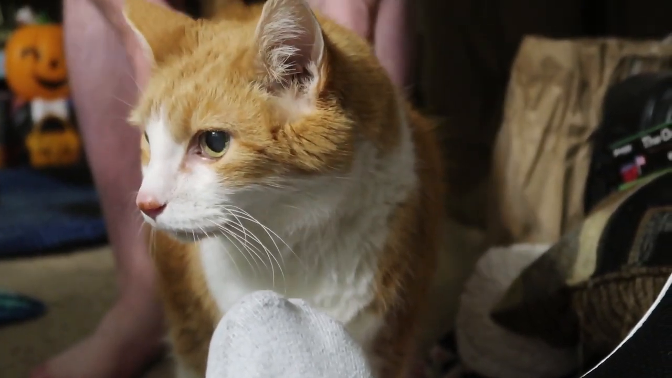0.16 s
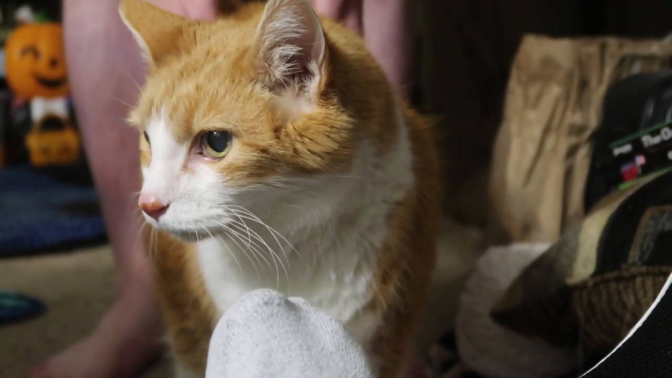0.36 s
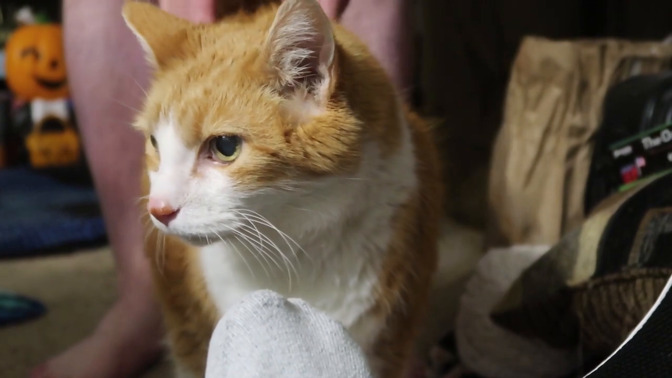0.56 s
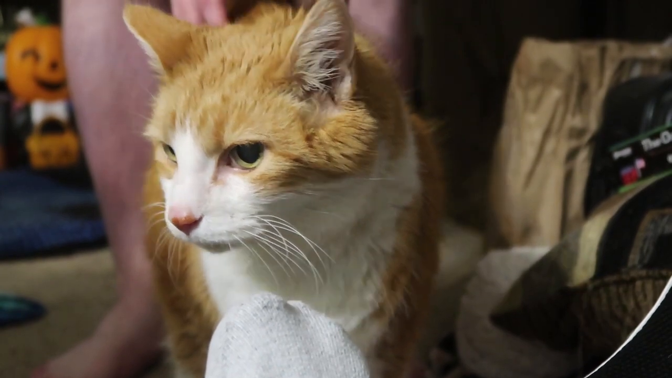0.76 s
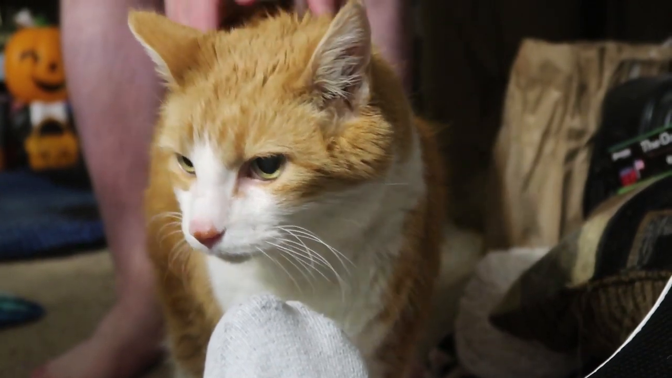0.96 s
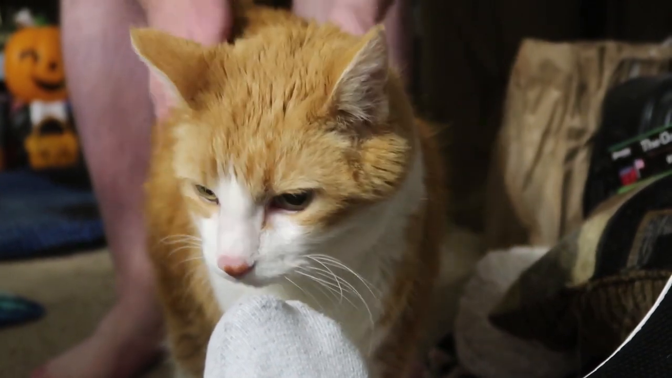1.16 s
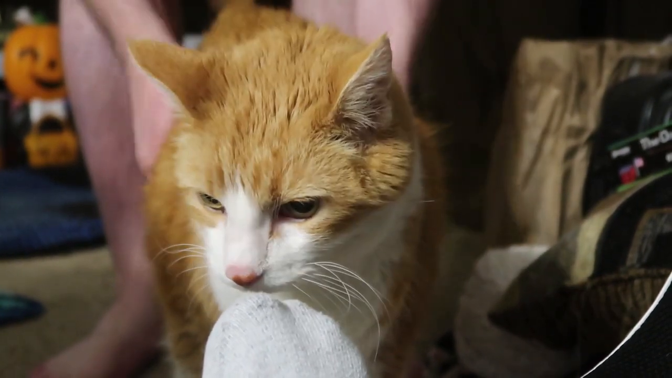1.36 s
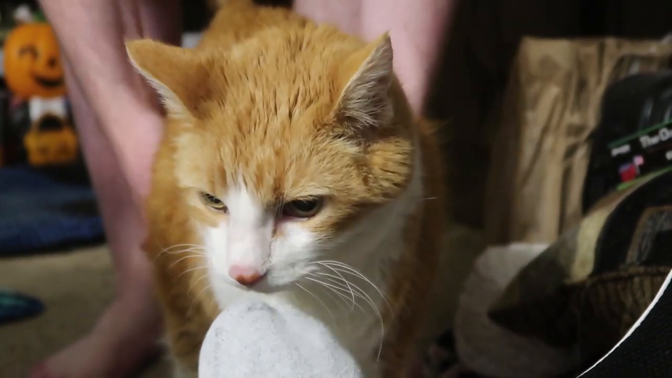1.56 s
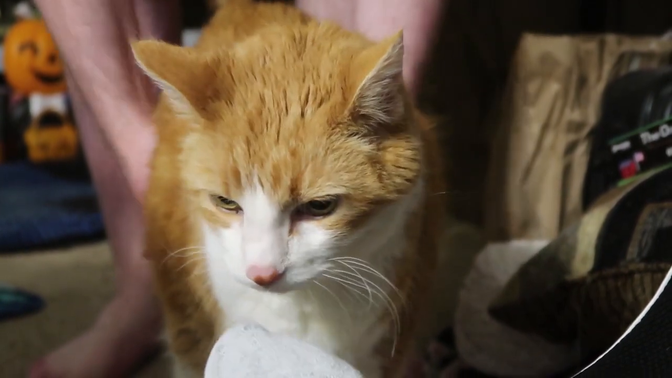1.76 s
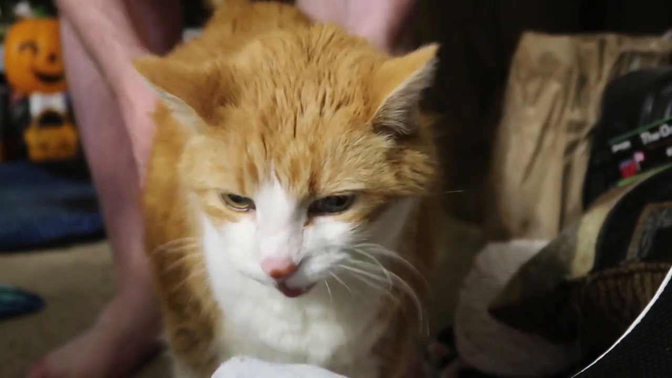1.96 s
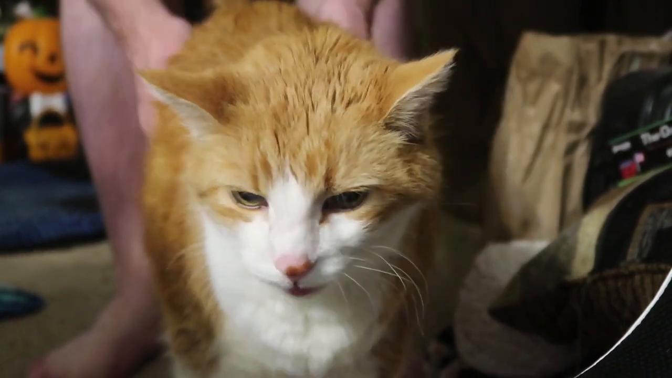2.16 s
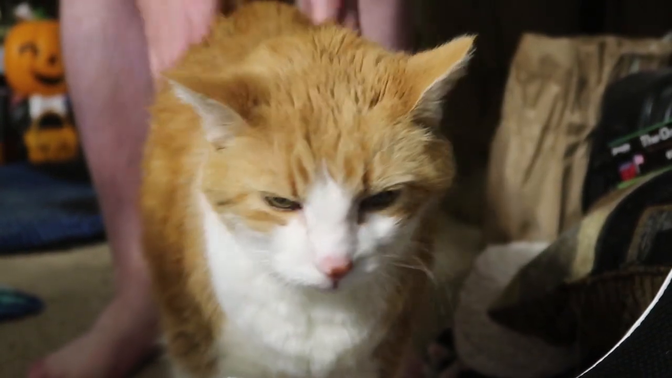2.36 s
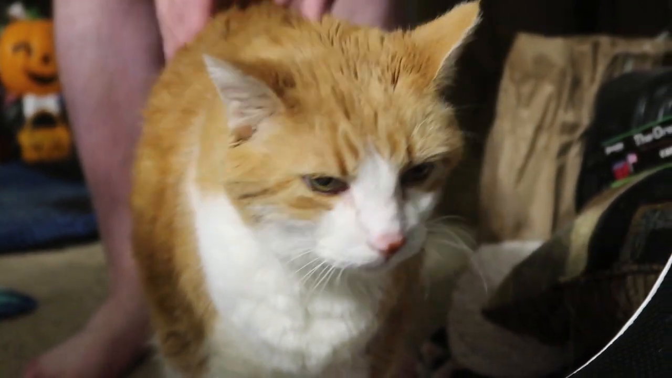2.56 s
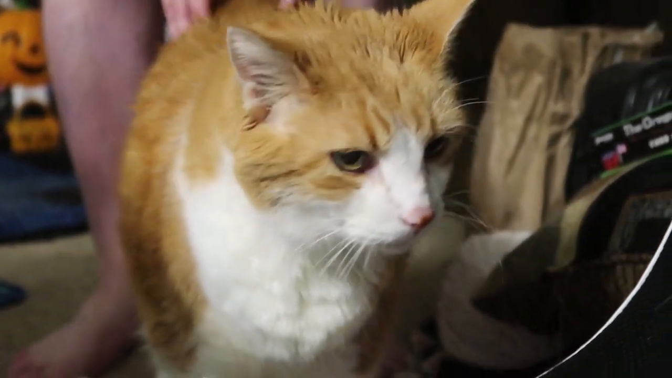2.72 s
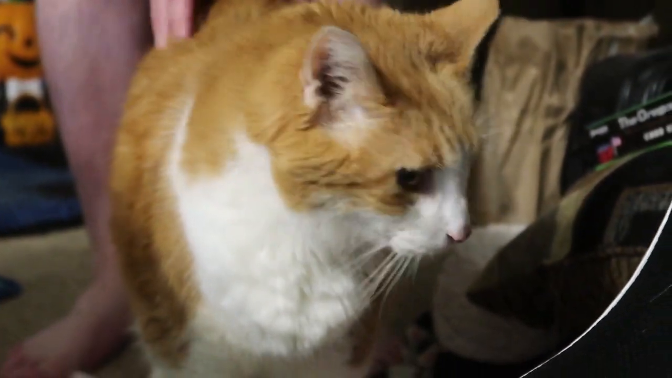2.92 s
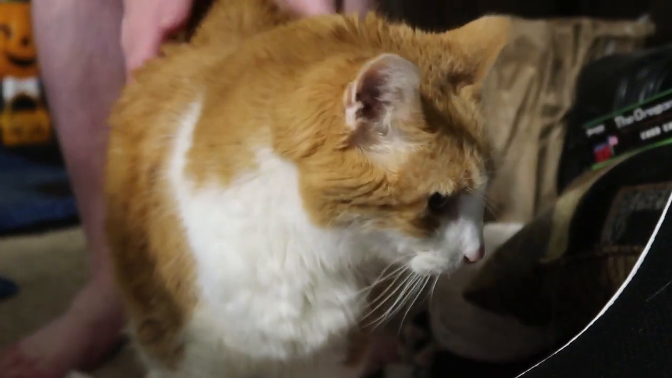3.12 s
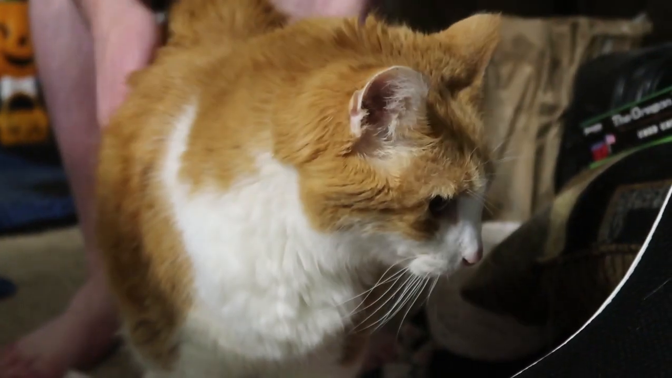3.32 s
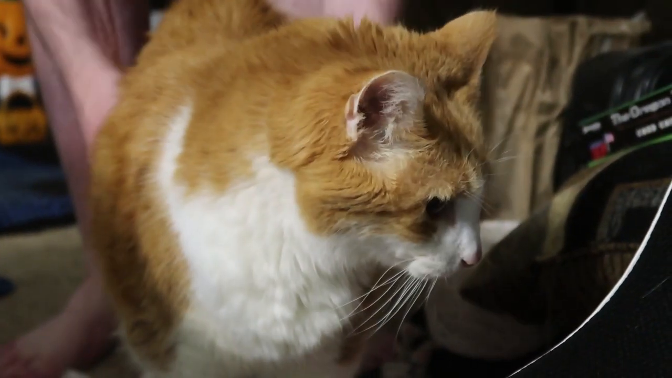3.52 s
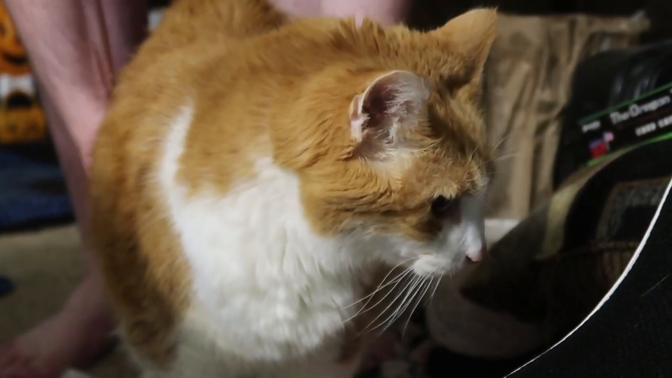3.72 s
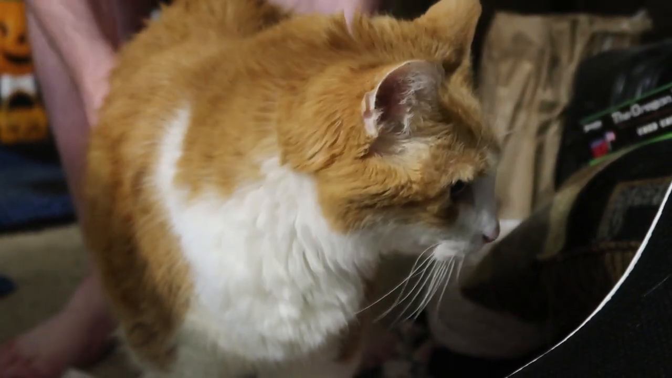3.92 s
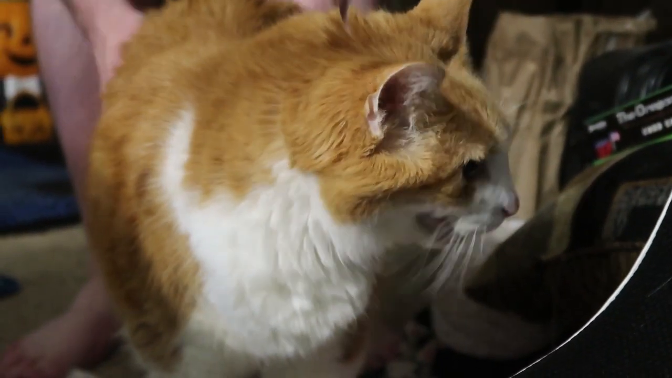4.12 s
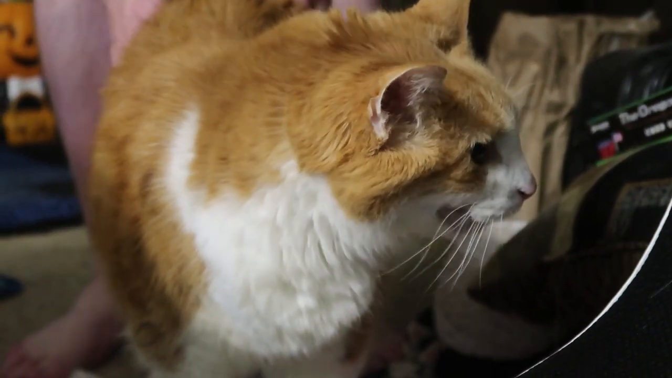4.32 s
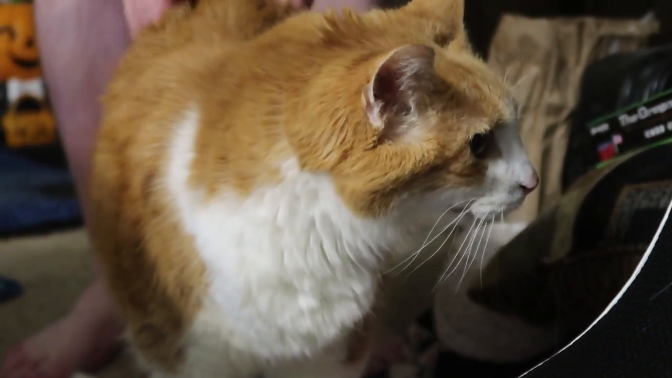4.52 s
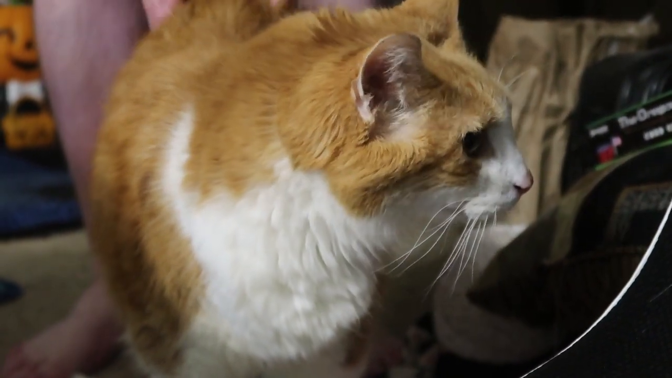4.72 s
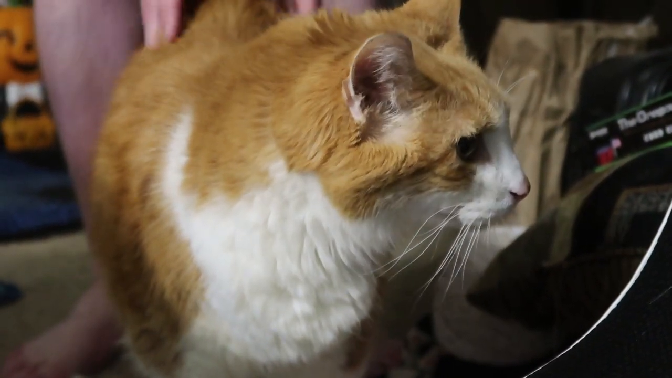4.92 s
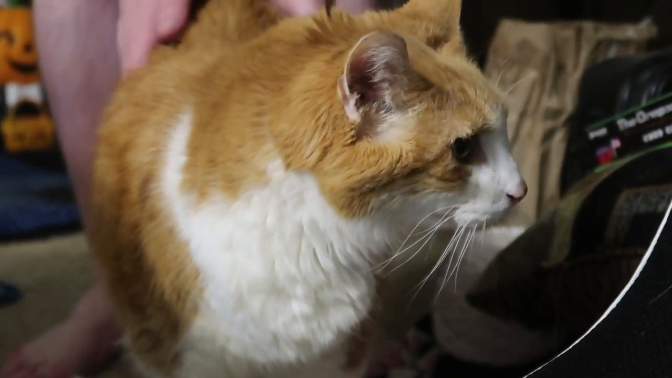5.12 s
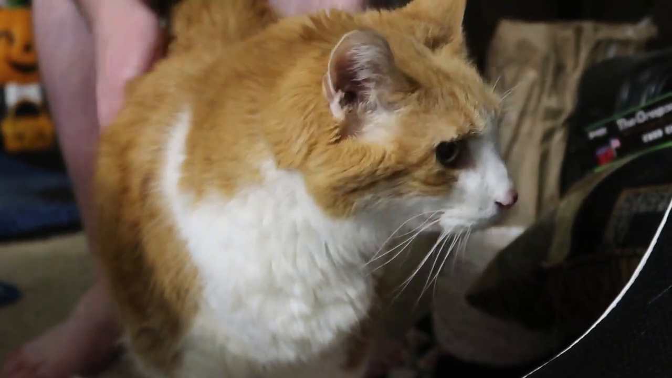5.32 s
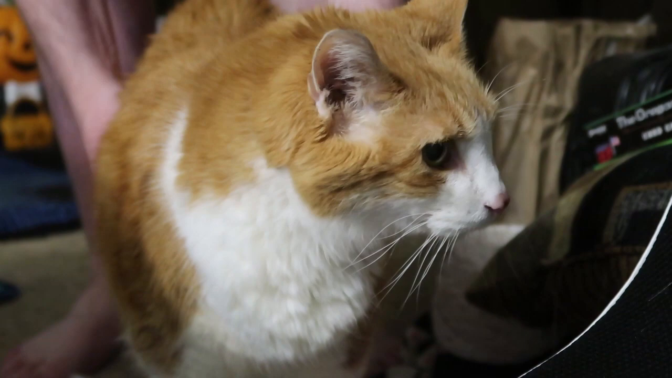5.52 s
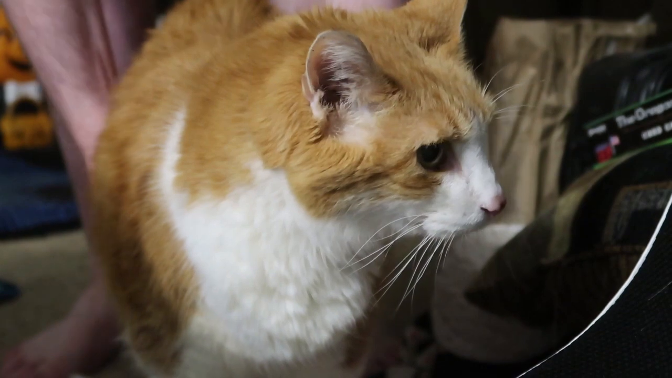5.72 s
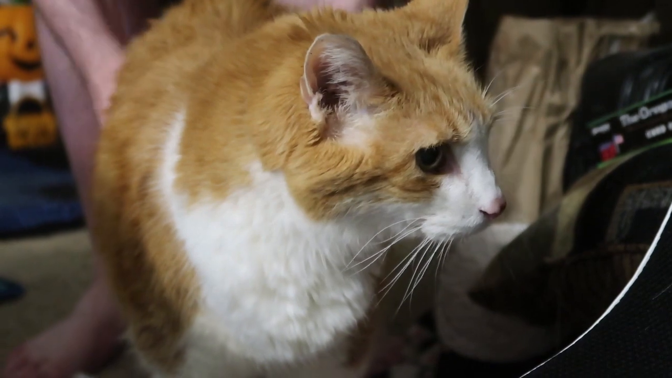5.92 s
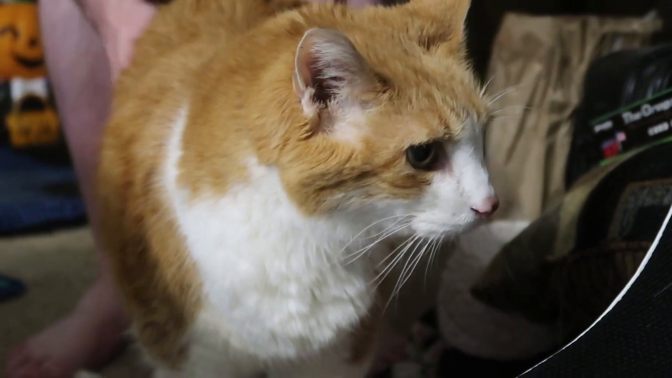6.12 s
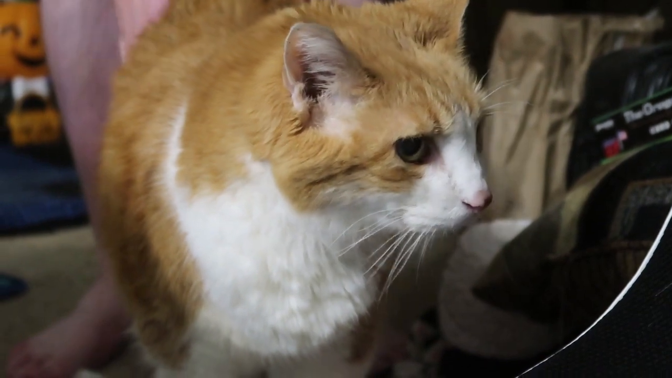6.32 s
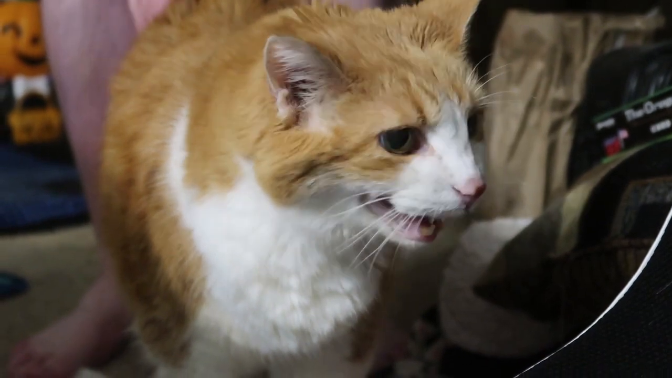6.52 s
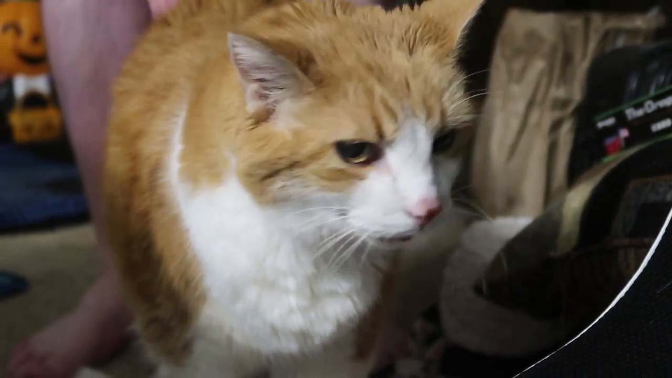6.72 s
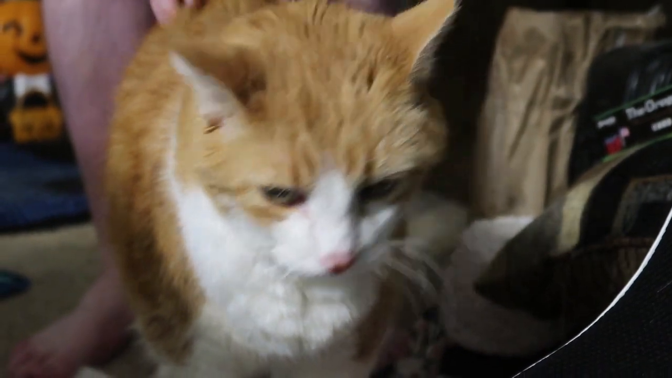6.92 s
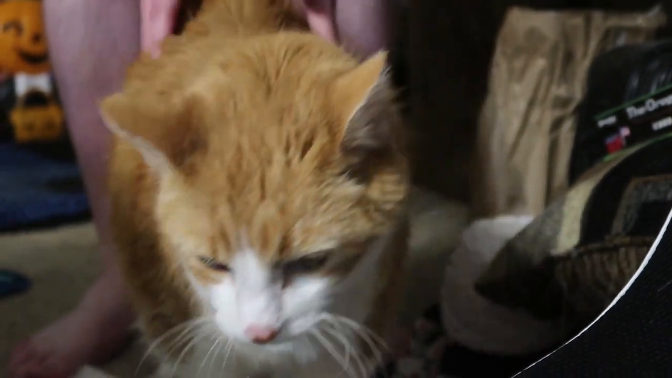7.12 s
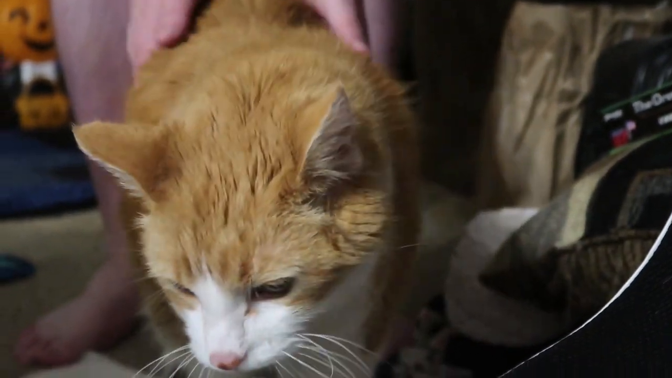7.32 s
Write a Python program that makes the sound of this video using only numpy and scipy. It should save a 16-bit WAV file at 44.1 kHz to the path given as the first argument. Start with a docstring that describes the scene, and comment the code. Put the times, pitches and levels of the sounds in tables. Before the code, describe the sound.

In a quiet carpeted room, a hand faintly strokes a cat's fur with one tiny dry tick. Then the cat meows three times, a couple of seconds apart. Each cry begins as a soft throaty trill, opens into a clear, bright voice, slides downward and closes in a short hum. Low mains hum, room air and light hiss continue underneath. The stereo microphone is close, with very little room echo.

```python
"""A cat meows three times

Close by in a carpeted room, each cry starts as a closed-mouth trill, opens into a clear pulsed voice whose
mouth resonance slides down, and ends in a short hum. Each fold beat is a pulse shaped by resonances.
A hand strokes the fur (shaped noise), and there is one dry tick.
Mains appliances hum (steady tones) over soft room air and microphone hiss (shaped noise).
"""
import sys
import numpy as np
from scipy import signal
from scipy.fft import rfft, irfft, next_fast_len
from scipy.io import wavfile
from scipy.ndimage import map_coordinates

SR = 44100
rng = np.random.default_rng(int(sys.argv[2]) if len(sys.argv) > 2 else 0)


def generate_wav(sig):
    """Save sig (samples, or channels by samples) to the path in sys.argv[1] as 16-bit PCM at SR."""
    pcm = np.round(np.clip(np.atleast_2d(sig).T, -1, 1) * 32767).astype(np.int16)
    wavfile.write(sys.argv[1], SR, pcm)


N = 329427  # length of the scene in samples
TOP_HZ = 13345  # nothing is kept above this
SIZE, LEAD = 2048, 128  # samples in one voice pulse, and how many come before the fold closure
HZ = np.fft.rfftfreq(SIZE, 1 / SR)

# Colour of the background noise shared by both sides: (frequency [Hz], relative level per Hz [dB])
NOISE_SHARED_COLOUR = [(12, -63.5), (20, -8), (27, -11.5), (48, -9.5), (87, -2.5), (123, -4), (145, -6.5),
                       (212, -10), (356, -11.5), (386, -13), (467, -13.5), (535, -16.5), (6000, -32),
                       (11500, -43), (13200, -59)]
# Colour of the background noise that differs between the sides, with a faint extreme-treble edge:
# (frequency [Hz], relative level per Hz [dB])
NOISE_DIFFERENCE_COLOUR = [(12, -35), (20, -27), (43, -25), (117, 1), (294, 3), (455, 3.5), (507, -6.5),
                           (565, -1.5), (665, -4), (972, -4.5), (6000, -20), (9270, -26.5), (11200, -29.5),
                           (12200, -37), (13200, -11.5)]
# Mains lines and motors just under them: (frequency [Hz])
HUM_LINES_HZ = [58.95, 59.44, 59.94, 118.83, 120.06, 178.3, 180.1, 353.87, 360.19]
# Average loudness of each hum line: (level [dB])
HUM_LEVELS_DB = [-71, -72, -63, -64.5, -67.5, -75, -74, -71, -75]
IN_STEP_S = 3.75  # all hum lines are in step at this moment

# Colour of the fur noise: (frequency [Hz], relative level per Hz [dB])
FUR_COLOUR = [(1500, -22), (2300, -2), (2850, -1.5), (3400, -2.5), (4500, -23), (7000, -42)]
STROKE_S, STROKE_LENGTH_S, STROKE_DB = 0.19, 0.95, -68  # the hand's start, duration and level
TICK_S, TICK_SPREAD_S, TICK_DB = .31, .006, -59  # the dry tick's centre, spread and level

# Throbs of the trills: (time [s], chest level [dB], throat level [dB], pitch [Hz])
TRILL_THROBS = [(1.927, -46.5, -47, 210.5), (1.943, -54.5, -44, 222), (4.063, -56, -56, 183),
                (4.073, -45, -68, 209), (4.094, -43, -50, 193), (4.123, -41, -47.5, 196),
                (4.152, -42, -41.5, 220), (6.17, -55, -70, 146), (6.215, -49.5, -56, 180.6),
                (6.232, -46.5, -58, 147.5), (6.285, -51, -55, 219), (6.306, -43.5, -50.5, 172.4),
                (6.336, -43.5, -44, 183.6), (6.362, -44.5, -43.5, 188.3), (6.386, -44, -41.5, 185.5),
                (6.405, -43.5, -50, 162), (6.425, -45.5, -40, 175), (6.445, -46.5, -41.5, 183.6)]
# Low resonances of the closed mouth: (frequency [Hz], width [Hz], relative level [dB])
CLOSED_MOUTH_LOW = [(814, 224, -5.5), (1227, 180, -7)]
# High resonances of the closed mouth: (frequency [Hz], width [Hz], relative level [dB])
CLOSED_MOUTH_HIGH = [(2320, 260, -11.5), (4090, 326, -9.5), (5700, 370, -13)]
# Closed-mouth treble against the throat, for a throb at SOFT_DB: (time [s], level [dB])
TRILL_TREBLE = [(1.93, -13), (4.1, -10), (6.3, -5.5)]
BRIGHTER, SOFT_DB = 0.46, -47.5  # treble gains this many dB per dB of throat level above SOFT_DB

# Voiced stretches: the first cry whole, the later two as a lead-in and a main cry;
# one list per stretch: (time [s], pitch [Hz])
VOICE_PITCH = [
    [(1.965, 232), (1.981, 260.4), (2.015, 224.1), (2.055, 245), (2.199, 242.5), (2.237, 236.8),
     (2.261, 238.5), (2.38, 222), (2.491, 210), (2.527, 197), (2.547, 167), (2.561, 192), (2.575, 186)],
    [(4.176, 253.4), (4.194, 278.4), (4.212, 260), (4.238, 266.6), (4.268, 264)],
    [(4.27, 256.8), (4.298, 232.3), (4.322, 236), (4.388, 222.1), (4.45, 221.3), (4.574, 208.4),
     (4.692, 190.5), (4.708, 178), (4.728, 193), (4.745, 178)],
    [(6.46, 218.6), (6.484, 246), (6.524, 285)],
    [(6.529, 293), (6.539, 293.5), (6.553, 242), (6.581, 227), (6.605, 236.9), (6.665, 234.3),
     (6.685, 230.8), (6.776, 228.8), (6.795, 225.6), (6.865, 225), (6.891, 210.7), (6.913, 185.4),
     (6.93, 188)],
]
# The vocal tract through each stretch:
# (time [s], throat level [dB], chest level [dB], mouth resonance [Hz], jaw opening [0-1])
TRACT_SHAPES = [
    [(1.965, -54, -54, 1610, 0), (1.989, -40.5, -57, 1620, 0.26), (2.007, -33, -45, 1610, 0.48),
     (2.025, -34.5, -49.5, 2040, 0.94), (2.04, -36.5, -55, 2090, 1), (2.074, -36, -63, 2140, 1),
     (2.172, -33, -64, 2140, .97), (2.236, -32.5, -56.5, 2045, 0.95), (2.29, -31, -57, 1793, 0.71),
     (2.338, -30.5, -49, 1616, 0.71), (2.412, -30.5, -50.5, 1664, 0.35), (2.474, -34, -47, 1510, 0.22),
     (2.522, -40, -47, 1390, .1), (2.542, -45.5, -37.5, 1320, 0.35), (2.575, -70, -63, 1380, .1)],
    [(4.176, -44, -47, 1430, 0.07), (4.192, -42.5, -58, 1480, 0), (4.208, -47, -46.5, 1440, 0.63),
     (4.218, -39, -54, 1520, 0.17), (4.229, -39, -60, 1790, 0.48), (4.24, -44, -59, 2300, 0.2),
     (4.255, -41.5, -63, 2420, 0.3), (4.266, -46, -59, 2450, 0.8)],
    [(4.27, -36, -50, 2480, 0.74), (4.3, -35.5, -58.5, 2160, 0.95), (4.322, -33.5, -49, 2230, 0.92),
     (4.352, -33, -50, 2400, 0.8), (4.365, -33, -51, 2210, 0.8), (4.38, -35.5, -49, 2177, 0.97),
     (4.446, -31.5, -51, 1900, 0.81), (4.495, -37, -49, 1640, 0.96), (4.503, -38.5, -51, 1690, .7),
     (4.534, -36.5, -51, 1680, 0.69), (4.604, -40, -47, 1452, 0.41), (4.626, -35, -48.5, 1410, 0.13),
     (4.7, -47.5, -47.5, 1370, 0), (4.745, -70, -62, 1376, .05)],
    [(6.46, -62, -68, 1307, 1), (6.485, -54, -66, 1570, 0.93), (6.508, -58, -74, 2000, 0.95),
     (6.524, -53, -57, 2450, 0.96)],
    [(6.529, -36, -52, 2250, 0.63), (6.545, -38.5, -72, 2140, 0.84), (6.579, -34.5, -55, 2220, 0.88),
     (6.639, -34, -56.5, 2180, 0.84), (6.711, -36.5, -56.5, 1940, 0.73), (6.77, -36.5, -61, 1840, 0.5),
     (6.82, -38.5, -55, 1640, 0.32), (6.849, -40, -61, 1710, 0), (6.887, -42.5, -53, 1570, 0),
     (6.905, -53, -53, 1440, .05), (6.92, -50, -51, 1390, 0.35), (6.935, -67, -56, 1376, 0.3)],
]
# Pose of the head in each stretch: (left gain at 2 kHz [dB], the right takes the opposite;
# third resonance at a wide mouth [Hz], its movement with the mouth resonance [Hz per Hz],
# fourth before the jaw moves it [Hz], fifth before rounding [Hz], mouth breadth [factor],
# extra level of the third, fourth and fifth towards the microphones [dB, dB, dB])
HEAD_POSES = [(-0.27, 3610, 0.22, 5060, 6160, 1.11, .1, .1, .1),
              (-1, 2600, .05, 3900, 5900, 0.73, .1, .1, .1),
              (-0.68, 3350, 2.03, 4760, 5860, 0.94, 0.12, .1, .1),
              (-0.7, 3850, 0.041, 4000, 6200, 1.1, .1, .1, 0.088),
              (-0.61, 3730, 0.5, 5000, 5880, 0.96, 2, 1.4, 5.8)]
# Unevenness of the fold beats in each stretch: (steady [0-1], added at the start [0-1], fading time [s])
FOLD_UNEVENNESS = [(.06, .28, .04), (.07, .16, .015), (.07, .08, .02), (.24, .07, .05), (.1, .16, .09)]
# The folds stumble: (time [s], added roughness [0-1])
FOLD_CATCHES = [(4.29, .2), (4.357, .16), (4.495, .1), (6.64, .06)]
CATCH_S, END_ROUGH, END_S = .012, .2, .02  # spread of a catch; roughness at the end and its growth time

# Base widths of chest, throat, mouth, third, fourth and fifth resonance: (width [Hz])
BASE_WIDTHS_HZ = [94.5, 290, 164.6, 390, 563, 330]
# Jaw range of mouth, third, fourth and fifth against the throat, before the pose:
# (jaw shut [dB], jaw open [dB])
JAW_STRENGTHS_DB = [(-4.5, 8.5), (-41, 4), (-31, -4), (-28.5, -8.5)]
# Side cavity of the nose: (frequency [Hz], width [Hz], level against the fifth resonance [dB])
NOSE_CAVITY = [(6780, 1800, -13.5)]
DIP_HZ, DIP_WIDTH_HZ, DIP_DEPTH = 452.5, 30, 1  # the nose swallows one low band; depth 0-1
# what the jaw moves, as (shut, open): throat resonance in Hz, factor on the fourth resonance
THROAT_HZ, FOURTH_SHARE = (745, 834), (.9, 0.97)
# also (shut, open): factors on the base widths, and reach of the mouth's flanks in widths
MOUTH_WIDENING, THROAT_WIDENING, MOUTH_SKIRT = (0.68, 1.34), (0.73, 1.24), (7.7, 16)
WIDE_HZ = 2200  # mouth resonance of a wide mouth
ROUNDED_HZ, FIFTH_SINKS = 1790, 3.1  # below this the lips round and the fifth sinks, Hz per Hz

# Echoes from carpet and furniture close by:
# (delay [ms], left level in the high treble [dB], right level in the high treble [dB])
NEAR_ECHOES = [(.9, -28.5, -57.5), (1.701, -13, -10.5), (2.599, -11.5, -3.5), (3.898, -17, -16)]
# How long the room rings: (frequency [Hz], time to fall by 60 dB [s])
ROOM_DECAY = [(200, 0.6), (2000, 1), (8000, 0.039)]


def amp(db):
    """Turn decibels into a plain factor."""
    return 10 ** (np.asarray(db) / 20)


def unit(x):
    """Scale a sound to an average (rms) size of 1."""
    return x / np.sqrt(np.mean(x ** 2) + 1e-20)


def along(points, hz):
    """Read a (frequency, value) table between its points, on a log frequency axis."""
    f, v = np.transpose(points)
    return np.interp(np.log(hz + 1), np.log(f + 1), v)


def wobble(rate):
    """Make a smooth random curve with this many knots a second."""
    knots = rng.standard_normal(int(N * rate / SR) + 4)
    return map_coordinates(knots, [np.arange(N) * rate / SR])


def filtered(x, response):
    """Colour a sound by multiplying its spectrum with a response of frequency."""
    m = next_fast_len(N + SR // 2)
    spectrum = rfft(x, m) * response(np.fft.rfftfreq(m, 1 / SR))
    return irfft(spectrum, m)[..., :N]


def air():
    """Room air, hiss and a faint extreme-treble edge are noise: alike on both sides in the bass only."""
    shared = filtered(rng.standard_normal(N), lambda hz: amp(along(NOISE_SHARED_COLOUR, hz)))
    difference = filtered(rng.standard_normal(N), lambda hz: amp(along(NOISE_DIFFERENCE_COLOUR, hz)))
    mid, side = unit(shared) * amp(-54.5), unit(difference) * amp(-55.5)
    drift = amp(0.28 * wobble(3.27))
    return drift * np.array([mid + side, mid - side])


def hum():
    """Mains lines and motors just under them are steady tones; close neighbours swell and fade together."""
    t = np.arange(N) / SR - IN_STEP_S
    total = np.zeros(N)
    for hz, db in zip(HUM_LINES_HZ, HUM_LEVELS_DB):
        level = np.sqrt(2) * amp(db + .8 * wobble(2.8))
        total += level * np.cos(2 * np.pi * hz * t)
    return total


def rustle():
    """A hand on fur and one tick make faint dry noise, unrelated on the two sides."""
    t = np.arange(N) / SR
    arch = np.sin(np.pi * np.clip((t - STROKE_S) / STROKE_LENGTH_S, 0, 1))
    stroke = amp(STROKE_DB + 3.5 * wobble(25)) * arch
    tick = amp(TICK_DB) * np.exp(-((t - TICK_S) / TICK_SPREAD_S) ** 2)
    noise = filtered(rng.standard_normal((2, N)), lambda hz: amp(along(FUR_COLOUR, hz)))
    return (stroke + tick) * unit(noise)


def peak(hz, width, skirt):
    """A resonance of energy 1 that rings after a push, narrowed far out by a wide one; one row per centre."""
    centre, width = np.reshape(hz, (-1, 1)), np.reshape(width, (-1, 1))

    def band(w):
        return 1j * HZ * w / (centre * centre - HZ * HZ + 1j * HZ * w)

    h = band(width) * band(skirt * width)
    return h / np.sqrt(2 * np.sum(abs(h) ** 2, axis=1, keepdims=True) / SIZE)


def modes(table, skirt):
    """Fixed resonances ring side by side, in alternating phase."""
    return sum((-1) ** k * amp(db) * peak(hz, width, skirt) for k, (hz, width, db) in enumerate(table))


def add_fold_pulses(out, s, pitch, spectra, rough, breath):
    """Each fold closure gives one pulse; roughness scatters its size and time and blurs it with breath."""
    chance = rng.standard_normal((len(s), 2))
    at = (s + .2 * rough ** 2 * chance[:, 0] / pitch) * SR
    puff = rng.standard_normal((len(s), 512)) * amp(-60 * np.arange(512) / SR / .012)  # -60 dB in 12 ms
    puff = rfft(puff / np.linalg.norm(puff, axis=1, keepdims=True), SIZE)
    # turbulence grows to the treble
    share = np.clip(rough[:, None] ** 2 * (1 + breath * (HZ / 5000) ** 2), 0, 1)
    source = np.sqrt(1 - share) + np.sqrt(share) * puff
    source /= (1 + 1j * HZ / 7500) ** 6  # softens the treble
    # the low part swells before the folds snap shut
    opening = -((1 + 1j * HZ / 900) / (1 - 1j * HZ / 900)) ** 2
    size = np.sqrt(SR / pitch) * amp(4 * rough * chance[:, 1])
    shift = np.exp(-2j * np.pi * HZ / SR * (at % 1 + LEAD)[:, None])  # places it between samples
    pulses = irfft(size[:, None] * spectra * source * opening * shift, SIZE)
    np.add.at(out, at.astype(int)[:, None] + np.arange(SIZE) - LEAD, pulses)


def trill():
    """Behind closed lips the folds beat in throbs of a few uneven pulses."""
    out, k = np.zeros(N + SIZE), np.arange(6)  # six pulses a throb
    high, low = modes(CLOSED_MOUTH_HIGH, skirt=3.0), modes(CLOSED_MOUTH_LOW, skirt=1.8)
    for s, chest_db, throat_db, pitch in TRILL_THROBS:
        treble_db = np.interp(s, *np.transpose(TRILL_TREBLE)) + BRIGHTER * (throat_db - SOFT_DB)
        tract = amp(chest_db) * peak(pitch, 99, skirt=4.5) - amp(throat_db) * low
        tract += amp(throat_db + treble_db) * high
        swell = amp(-1.3 * (k - 1.8) ** 2 + 1.4 * rng.standard_normal(len(k)))[:, None]
        times, pitches, rough = s + (k - .6) / pitch, np.full(len(k), pitch), np.full(len(k), .25)
        add_fold_pulses(out, times, pitches, swell * tract, rough, breath=14)
    return out[:N]


def fold_times(s, hz):
    """The folds close once each time the running pitch completes a whole turn."""
    grid = np.arange(s[0], s[-1], 1 / SR)
    turns = np.cumsum(np.interp(grid, s, hz)) / SR
    return np.interp(np.arange(int(turns[-1]) + 1), turns, grid)


def fold_roughness(t, first, last, uneven):
    """The fold beats are rougher at the start, at the end and where the folds stumble."""
    steady, start, fading = uneven
    rough = steady + start * np.exp((first - t) / fading) + END_ROUGH * np.exp((t - last) / END_S)
    for at, more in FOLD_CATCHES:
        rough += more * np.exp(-((t - at) / CATCH_S) ** 2)
    return rough


def meow(pitches, shape, pose, uneven):
    """Fold pulses ring chest, tract and nose; the jaw steers resonance frequencies, widths and strengths."""
    out, (s, hz) = np.zeros(N + SIZE), np.transpose(pitches)
    t = fold_times(s, hz)
    pitch, (when, *columns) = np.interp(t, s, hz), np.transpose(shape)
    throat_db, chest_db, mouth, jaw = [np.interp(t, when, column) for column in columns]

    def moved(shut, wide):
        return shut + (wide - shut) * jaw

    def tremor():  # tongue and jaw are never still
        return wobble(35)[(t * SR).astype(int)]

    _, third, sinks, fourth, fifth, breadth, *facing_db = pose
    centres = [mouth, third + sinks * (mouth - WIDE_HZ), fourth * moved(*FOURTH_SHARE),
               fifth - FIFTH_SINKS * np.maximum(ROUNDED_HZ - mouth, 0)]
    strengths_db = [moved(*pair) + more for pair, more in zip(JAW_STRENGTHS_DB, [0] + facing_db)]
    chest_width, throat_width, mouth_width, *upper_widths = BASE_WIDTHS_HZ
    widths = [mouth_width * moved(*MOUTH_WIDENING) * breadth] + list(upper_widths)
    skirts = [moved(*MOUTH_SKIRT)[:, None], 10, 12, 12]
    tremors_db = [0.27, 1.3, 1.4, 1.6]

    chest = peak(pitch, chest_width, skirt=0.91) + amp(-7.5) * peak(2 * pitch, chest_width, skirt=0.78)
    lips = 1j * HZ / 450 / (1 + 1j * HZ / 450)  # a small opening radiates little bass
    throat = peak(moved(*THROAT_HZ), throat_width * moved(*THROAT_WIDENING), skirt=1.97)
    tract = lips * throat - amp(chest_db - throat_db)[:, None] * chest
    for k, (centre, level_db) in enumerate(zip(centres, strengths_db)):
        gain = amp(level_db + tremors_db[k] * tremor())[:, None]
        ringing = peak(centre * (1 + 0.0096 * tremor()), widths[k], skirt=skirts[k])
        tract -= (-1) ** k * gain * ringing
    tract -= amp(strengths_db[3] + 0.97 * tremor())[:, None] * modes(NOSE_CAVITY, skirt=7.9)
    swallowed = 1j * HZ * DIP_WIDTH_HZ / (DIP_HZ ** 2 - HZ * HZ + 1j * HZ * DIP_WIDTH_HZ)
    tract *= 1 - DIP_DEPTH * swallowed
    rough = fold_roughness(t, s[0], s[-1], uneven)
    add_fold_pulses(out, t, pitch, amp(throat_db)[:, None] * tract, rough, breath=20)
    return out[:N]


def aimed(x, left_db):
    """Off axis the far microphone loses treble and hears late; near surfaces return the treble."""
    side = np.array([[1], [-1]]) * left_db
    ms, *echo_db = np.transpose(NEAR_ECHOES)

    def tilt(hz):
        return amp(side * (hz / 2000) ** .4) * np.exp(1j * side * hz * 1e-4)

    def near(hz):
        delays = np.exp(-2j * np.pi * np.outer(ms / 1e3, hz))
        return amp(echo_db) @ delays / (1 + (2500 / (hz + 1)) ** 2)

    return filtered(x, lambda hz: tilt(hz) + near(hz))


def room(x):
    """The room answers with fading noise; each frequency dies at its own speed."""
    hz, t, z = signal.stft(rng.standard_normal((2, SR // 3)), SR, nperseg=256)
    fade = amp(-60 * t / along(ROOM_DECAY, hz)[:, None])
    tail = signal.istft(z * fade, SR, nperseg=256)[1]
    tail /= np.linalg.norm(tail[0])
    late = np.pad(x, (130, 0))[None]  # the answer starts 130 samples later
    return signal.fftconvolve(late, tail, axes=1)[:, :N]


def scene():
    """Add up the background, fur, trills and cries; only the cries get echoes and room."""
    stretches = zip(VOICE_PITCH, TRACT_SHAPES, HEAD_POSES, FOLD_UNEVENNESS)
    cries = [meow(*stretch) for stretch in stretches]
    direct = sum(aimed(cry, pose[0]) for cry, pose in zip(cries, HEAD_POSES))
    return air() + hum() + rustle() + trill() + direct + amp(-42.0) * room(sum(cries))


def record(dry):
    """A sharp limit removes everything from TOP_HZ up."""
    return filtered(dry, lambda hz: hz < TOP_HZ)


dry = scene()
out = record(dry)
generate_wav(out)
```